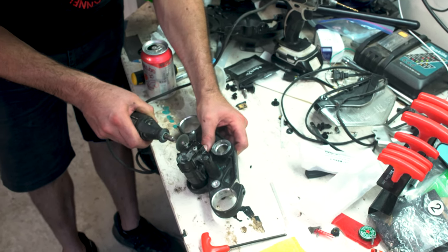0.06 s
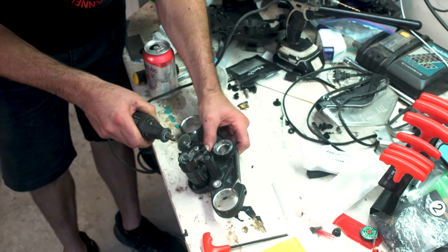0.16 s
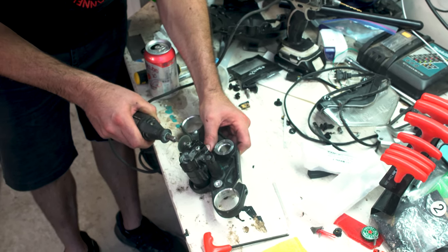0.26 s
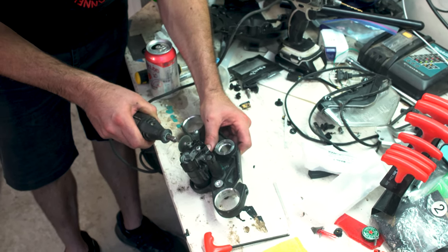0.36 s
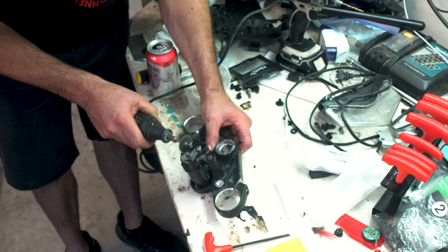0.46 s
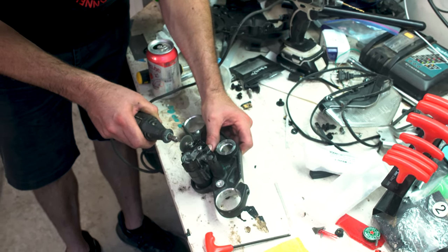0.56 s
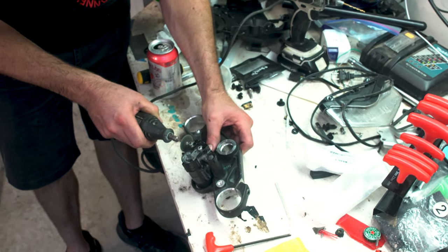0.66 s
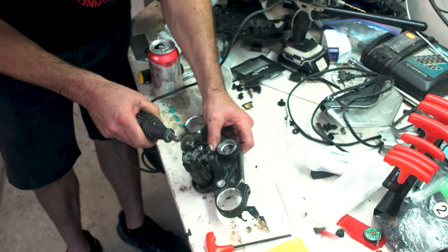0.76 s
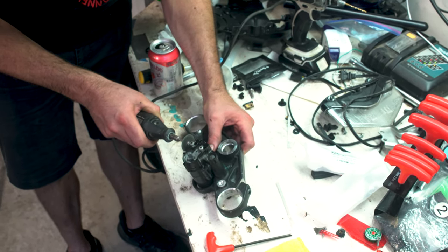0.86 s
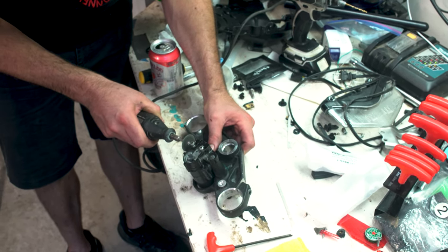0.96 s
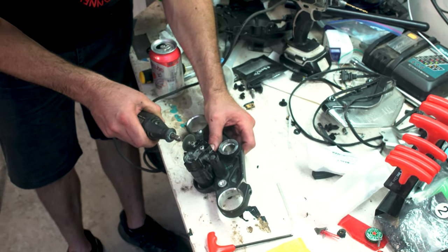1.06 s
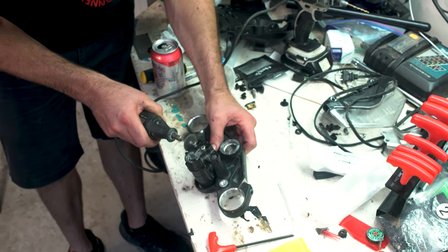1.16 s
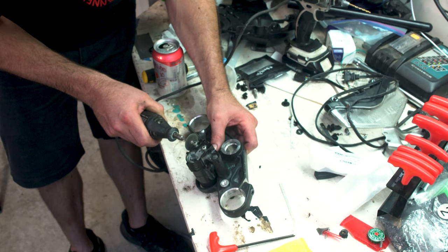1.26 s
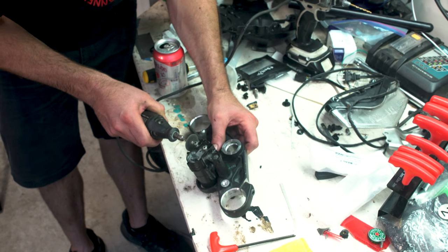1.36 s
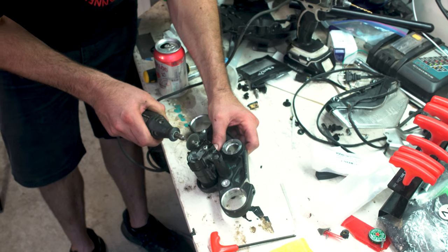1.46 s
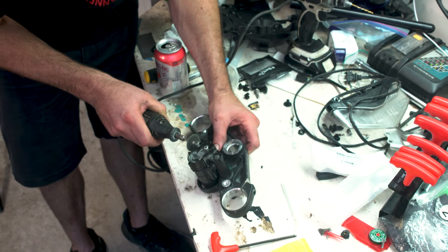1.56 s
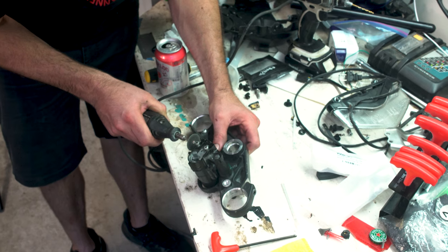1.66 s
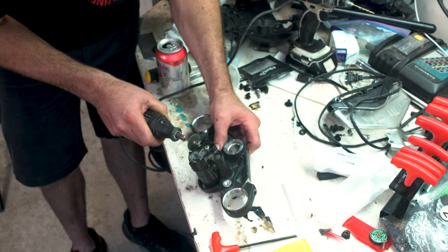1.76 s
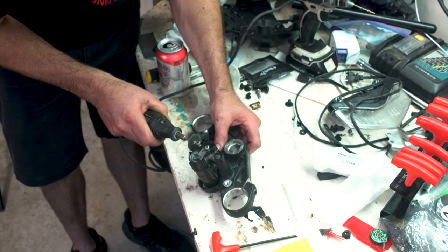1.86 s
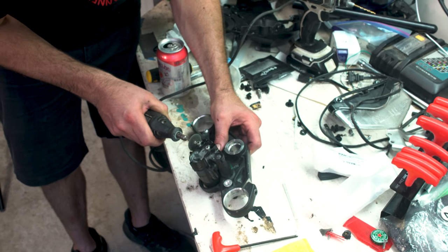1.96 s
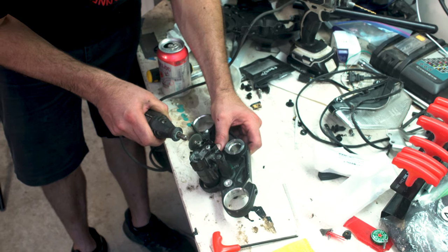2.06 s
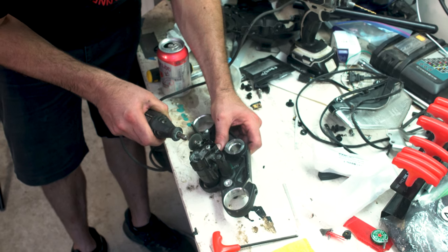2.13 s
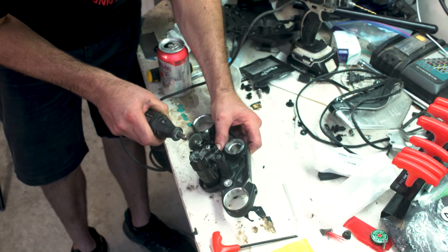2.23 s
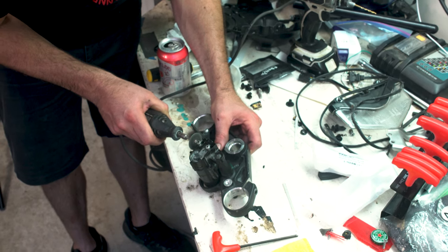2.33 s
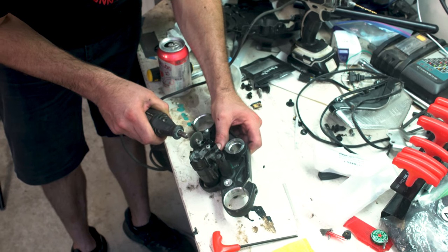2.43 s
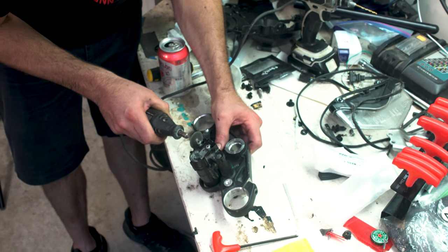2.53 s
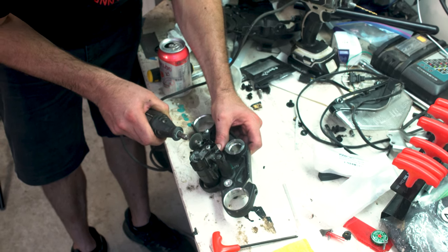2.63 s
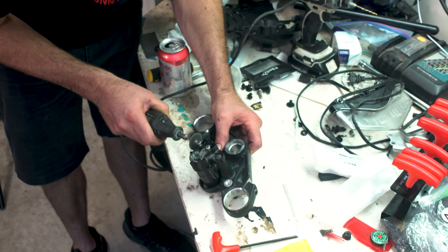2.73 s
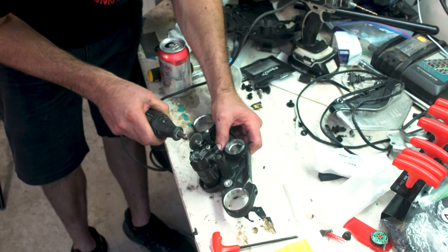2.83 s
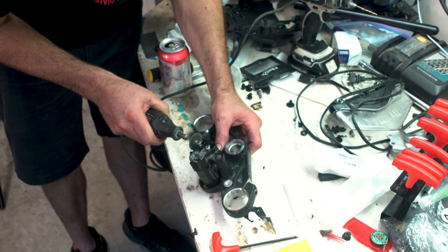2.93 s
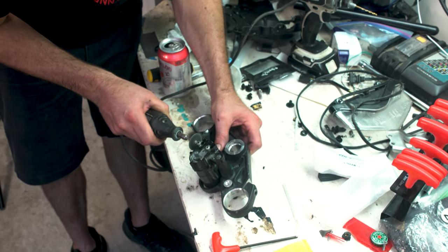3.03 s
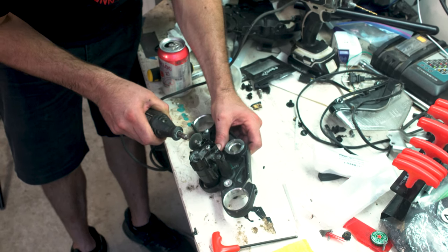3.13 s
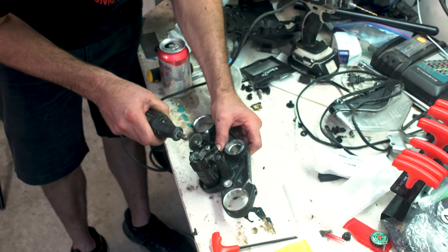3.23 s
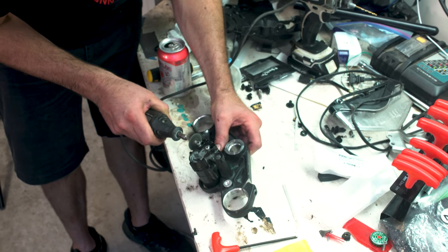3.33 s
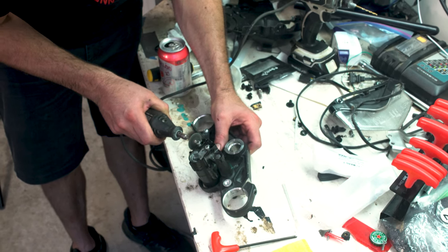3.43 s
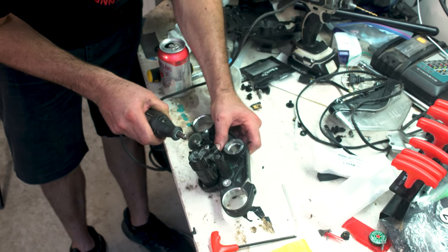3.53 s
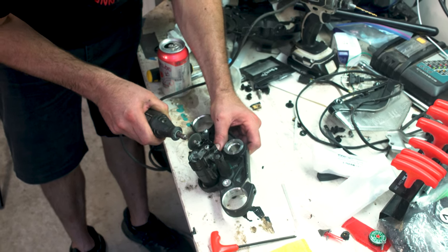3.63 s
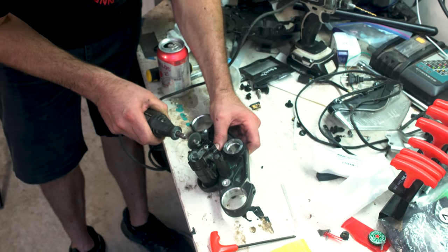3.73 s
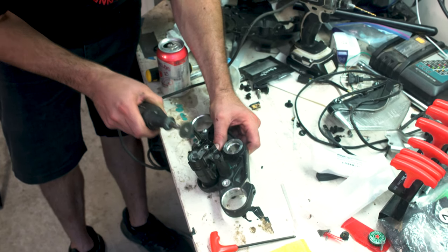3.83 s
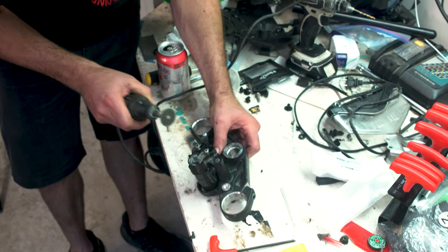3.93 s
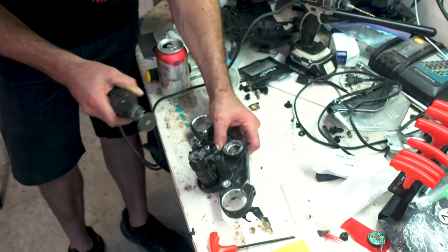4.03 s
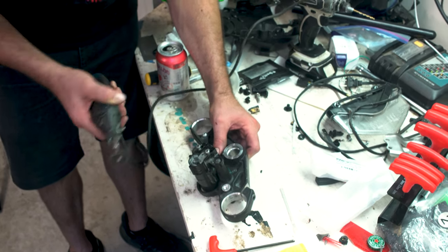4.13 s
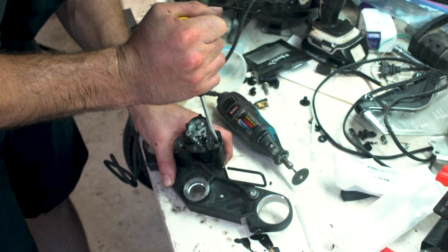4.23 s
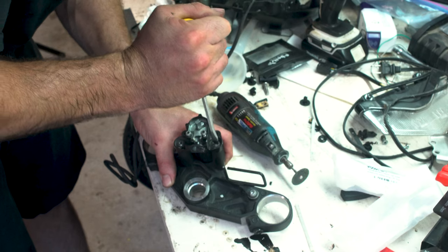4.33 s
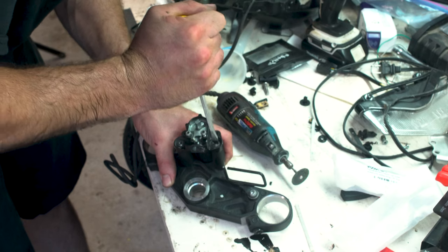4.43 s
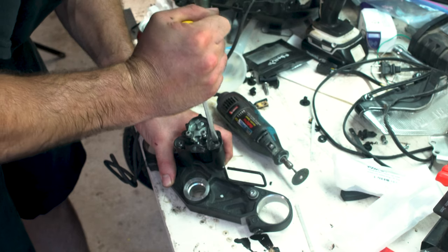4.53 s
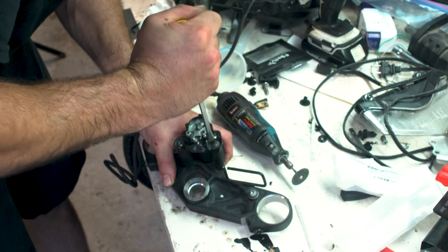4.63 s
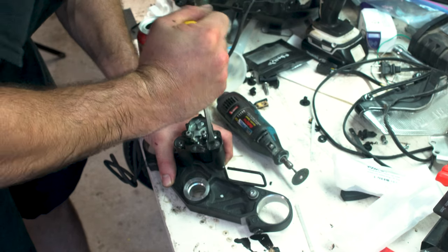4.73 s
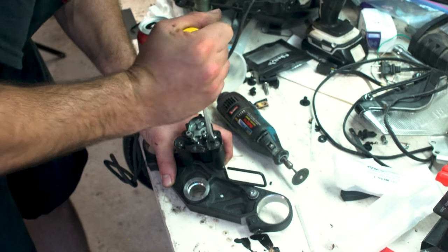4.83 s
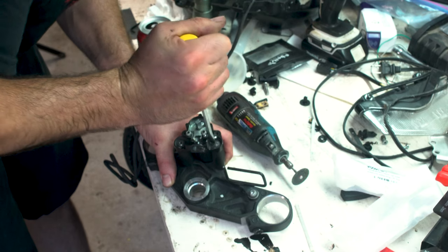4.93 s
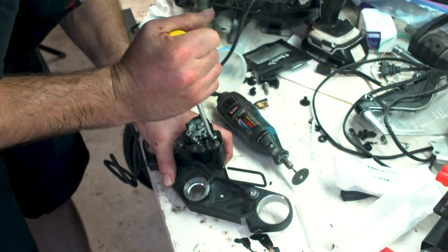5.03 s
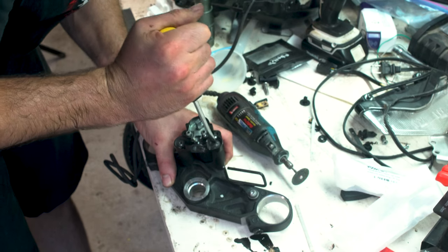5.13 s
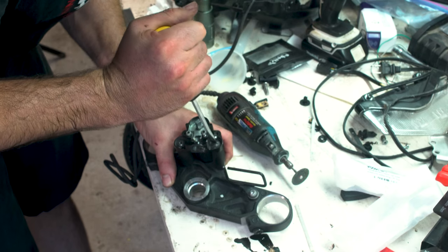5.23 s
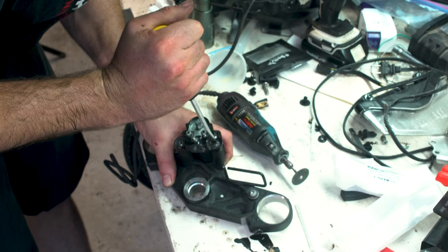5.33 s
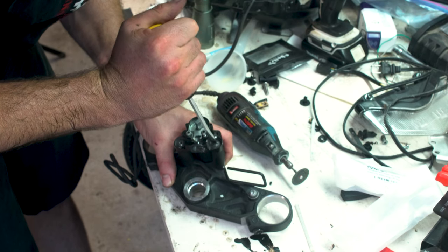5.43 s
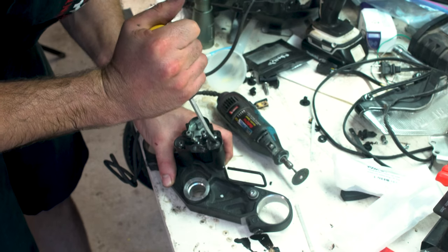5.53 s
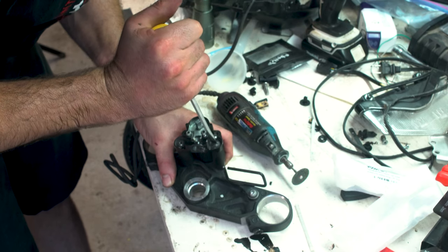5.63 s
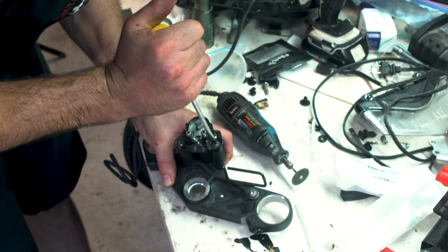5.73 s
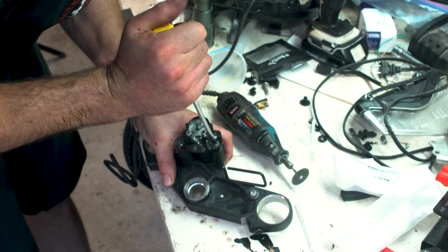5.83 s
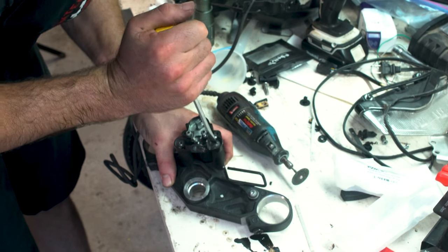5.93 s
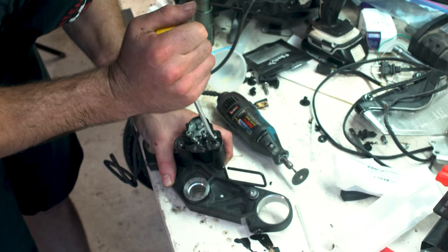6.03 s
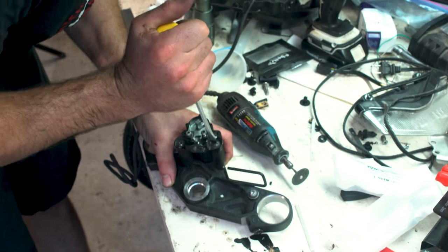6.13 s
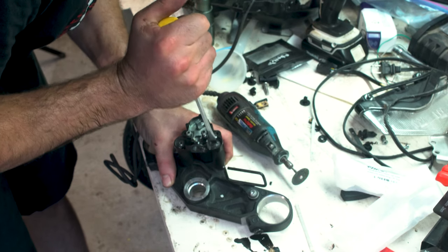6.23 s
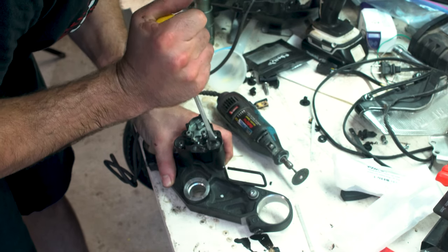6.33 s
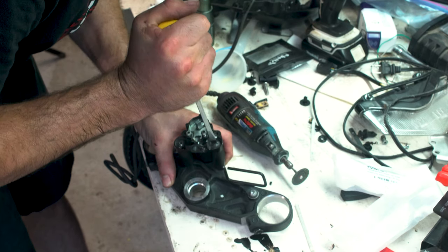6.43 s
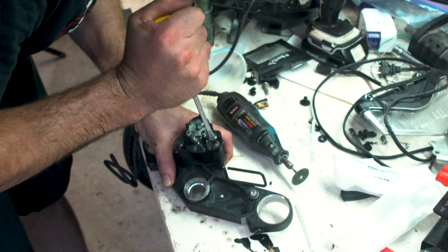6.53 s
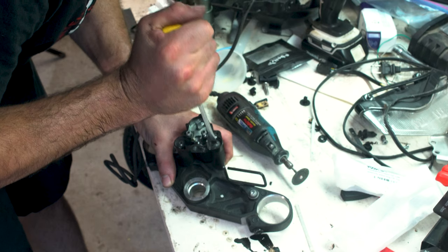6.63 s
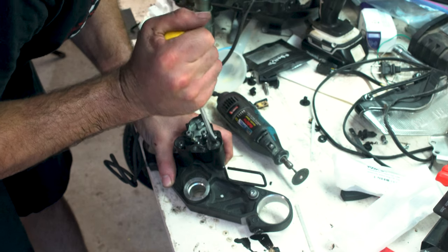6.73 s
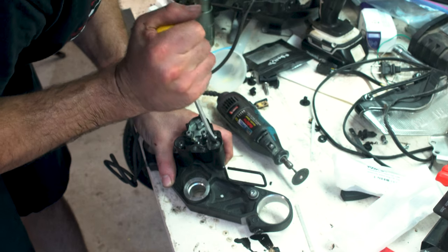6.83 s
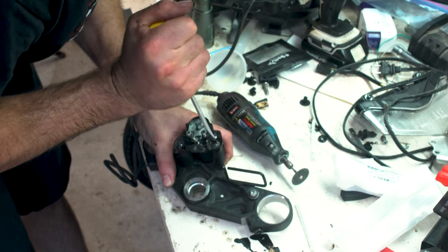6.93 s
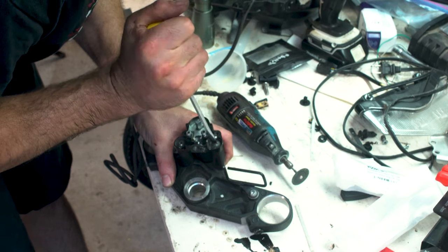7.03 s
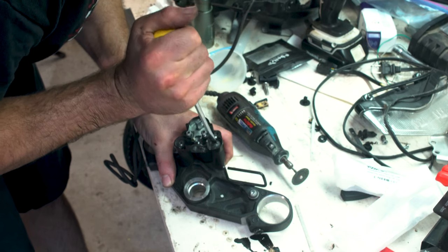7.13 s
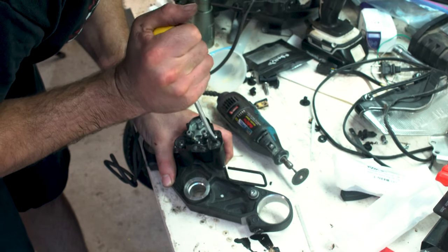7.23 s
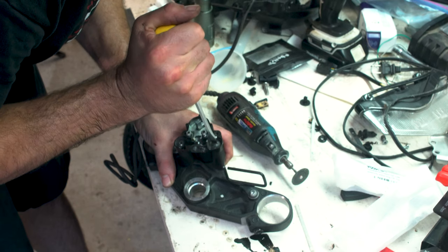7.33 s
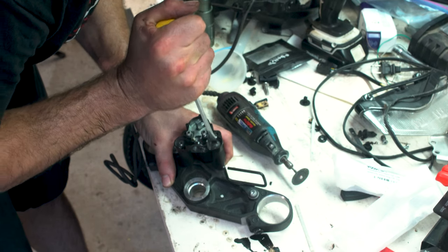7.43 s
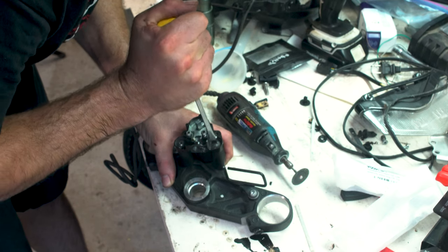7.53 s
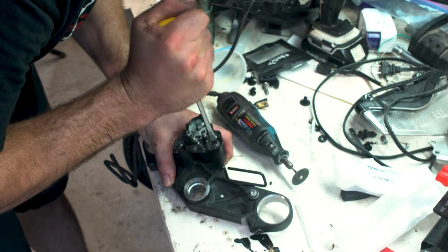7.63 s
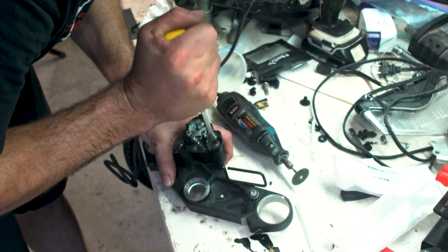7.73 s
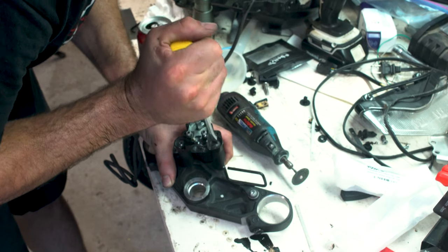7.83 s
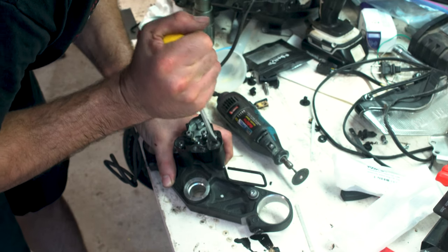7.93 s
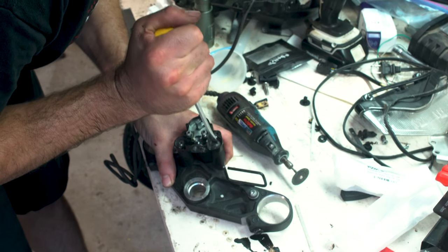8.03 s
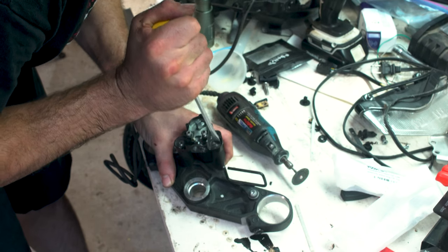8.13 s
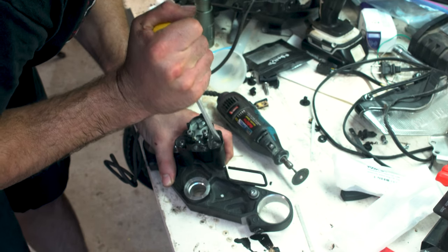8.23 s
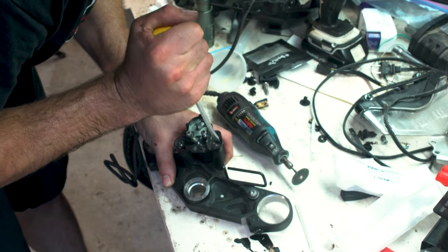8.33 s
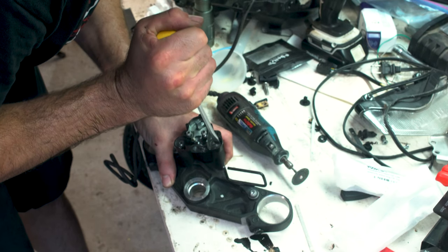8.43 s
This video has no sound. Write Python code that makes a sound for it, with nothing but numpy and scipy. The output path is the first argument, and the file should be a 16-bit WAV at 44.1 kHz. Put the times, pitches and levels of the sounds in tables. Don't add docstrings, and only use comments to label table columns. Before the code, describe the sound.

A small rotary tool grinds a hard metal bolt with wavering, sagging pitch, lifts off and revs up, then a screwdriver knocks sharply on metal.

```python
import sys
import numpy as np
from scipy import signal
from scipy.fft import rfft, irfft, next_fast_len
from scipy.io import wavfile
from scipy.ndimage import uniform_filter1d

SR = 44100
rng = np.random.default_rng(int(sys.argv[2]) if len(sys.argv) > 2 else 0)


def volts_from_db(level):
    exponent = np.asarray(level, float) / 20
    return 10 ** exponent


def int16_out(signal):
    q = np.round(np.clip(np.atleast_2d(signal).T, -1, 1) * 32767)
    wavfile.write(sys.argv[1], SR, q.astype(np.int16))


N = 373951
T = np.arange(N) / SR
LIFT_S, SPLICE_S = 3.835, 4.304
EDGE_S = 0.024


def level(x, db):
    return x * volts_from_db(db) / np.sqrt(np.mean(x[x != 0] ** 2))


def band(x, lo_hz, hi_hz):
    sos = signal.butter(2, [lo_hz, min(hi_hz, .45 * SR)], "bandpass", fs=SR, output="sos")
    return signal.sosfilt(sos, x)


def even(x):
    return x / np.sqrt(uniform_filter1d(x ** 2, size=2400) + 1e-12)


def colour(x, points, peaks=()):
    n = next_fast_len(len(x))
    f = np.maximum(np.arange(n // 2 + 1) * SR / n, 1)
    point_hz, point_db = np.transpose(points)
    db = np.interp(np.log(f), np.log(point_hz), point_db)
    db = db + sum(g / (1 + (2 * (f - hz) / w) ** 2) for hz, w, g in peaks)
    return irfft(rfft(x, n) * volts_from_db(db), n)[:len(x)]


def columns(table):
    s, *cols = np.transpose(table)
    return [np.interp(T, s, c) for c in cols]


def fade(t60):
    return np.exp(-np.log(1000) * T[:SR // 2] / t60)


def add(out, s, x):
    i = int(s * SR)
    out[i:i + len(x)] += x[:N - i]


def walk(rate):
    k = int(SR / rate)
    steps = np.repeat(rng.standard_normal(N // k + 1), k)
    return 2.11 * uniform_filter1d(uniform_filter1d(steps, k), k)[:N]


def spells(rows):
    return sum(h * np.clip(np.minimum(T - a, b - T) / EDGE_S + .5, 0, 1) for a, b, h in rows)


def freed(x, start, end, hz, width):
    out = np.zeros(N)
    part = slice(max(int((start - EDGE_S) * SR), 0), int((end + EDGE_S) * SR))
    out[part] = even(band(x[part], hz - width, hz + width))
    return out * spells([(start, end, 1)])


def modes(table, chance, spread_db):
    t, x = T[:SR // 2], 0
    for (hz, db, t60), (a, b) in zip(table, chance):
        x = x + volts_from_db(db + spread_db * a) * fade(t60) * np.sin(2 * np.pi * hz * (1 + 0.0082 * b) * t)
    return x / np.abs(x).max()


def room(x, wet_db):
    # pitch in Hz, time to die away by 60 dB in seconds.
    tail_times = [(125, 0.94), (250, 0.055), (500, 0.5), (1000, 0.21), (2000, 0.49), (4000, 0.15),
                  (8000, 0.096), (15000, 0.046)]
    tail = sum(band(rng.standard_normal(SR // 2), hz / 1.48, hz * 1.445) * fade(t60) for hz, t60 in tail_times)
    tail = tail * (1 - np.exp(-T[:SR // 2] / 0.0055))
    return x + volts_from_db(wet_db) * signal.fftconvolve(x, tail / np.sqrt(np.sum(tail ** 2)))[:N]


def rim(turns, keep, count):
    keep = np.clip(keep, 0, .99)
    fresh = rng.standard_normal((1200, count))
    wear = signal.lfilter([np.sqrt(1 - keep ** 2)], [1, -keep], fresh, axis=0)[40:]
    return np.interp(turns * count, np.arange(wear.size), wear.ravel())


def disc_bite(turns):
    # time in seconds, once-a-turn swing, twice-a-turn swing of the contact.
    wobble = [(0, .95, .05), (.3, .8, .1), (.65, .25, .45), (.8, .75, .3), (1.05, .45, .3), (1.25, .5, .45),
              (1.35, .85, .15), (1.55, .7, .1), (1.65, .3, .25), (2.15, .12, .12), (2.45, .2, .25),
              (2.55, .85, .25), (2.85, 1., .25), (3.15, .15, .35), (3.83, .2, .2)]
    once, twice = columns(wobble)
    press = once * np.cos(2 * np.pi * turns) + twice * np.sin(4 * np.pi * turns)
    press = press + .24 * rim(turns, 0.38, count=6)
    return 1 + np.tanh(press + 0.45) + 0.19 * np.exp(np.minimum(press, 2))


def edge_grit(turns):
    grit = level(rim(turns, .95, count=512), 0)
    pulse = np.exp(60 * (np.cos(2 * np.pi * turns) - 1)) ** 22
    strike = pulse * volts_from_db(1.7 * rim(turns, 0.51, count=1))
    return grit + level(strike - strike.mean(), -3)


def disc_and_bolt(x):
    # pitch in Hz, level in dB per Hz.
    smooth = [(300, -37.5), (600, -25), (1100, -2), (1450, -3.5), (2100, -1.5), (2600, -8), (3600, -13),
              (6400, -10), (6900, -5), (9500, -12.5), (11000, -12.5), (12200, -6), (12500, -2), (16000, -4)]
    # pitch in Hz, width in Hz, height in dB.
    bumps = [(1760, 900, 6.5), (2174, 150, 6.5), (2836, 200, 1), (4110, 150, 3), (4870, 110, 5),
             (5790, 450, 7), (7080, 330, 2.5), (7940, 1100, 6), (9030, 960, 12), (10230, 250, 5.5),
             (12780, 300, 1), (12150, 400, -3), (13050, 150, -4), (13240, 100, 1), (13920, 600, 3),
             (14600, 400, -3.5), (15300, 700, 5)]
    return colour(x, smooth, bumps)


def disc_hiss(bite, grit, fresh, hiss_db):
    # start in seconds, end in seconds, pitch in Hz, level in dB over the hiss.
    swells = [
        (.1, 1.35, 7450, -18),
        (2.45, 2.75, 7200, -13),
        (.9, 1.35, 8950, -12),
        (2.4, 2.6, 8950, -12),
        (2.75, 2.95, 8950, -9),
        (.8, 1.35, 14000, -13),
        (.1, 1.35, 12700, -15),
        (2.25, 3.05, 13950, -11),
        (.15, .35, 13400, -12),
    ]
    out = volts_from_db(hiss_db) * even(band(disc_and_bolt(bite * (fresh + 0.6 * grit)), 4180, 26000))
    for a, b, hz, db in swells:
        out = out + volts_from_db(hiss_db + db) * freed(bite * (fresh + grit), a, b, hz, 292)
    return out


def ringing_body(bite, grit, fresh, hiss_db, housing_db, bolt_db):
    body = disc_and_bolt(bite ** 0.29 * (grit + .15 * fresh))
    out = np.zeros(N)
    for lo, hi, db in [(550, 1650, housing_db), (1400, 2600, bolt_db), (2300, 3700, -11.5)]:
        out = out + volts_from_db(hiss_db + db + walk(7.94)) * even(band(body, lo, hi))
    rasp = disc_and_bolt(bite ** 0.4 * (1.2 * grit + 0.65 * fresh))
    return out + volts_from_db(hiss_db - 9.5) * even(band(rasp, 3060, 5790))


def scrapes_and_singing(bite, grit, hiss_db):
    # start in seconds, end in seconds, pitch in Hz, level in dB over the hiss.
    scrapes = [(0, .4, 1780, -20), (0, .55, 2130, -18), (.75, .86, 3200, -13), (1.0, 1.07, 3050, -12),
               (.9, 1., 3150, -16), (1.33, 1.46, 2750, -12), (1.52, 1.65, 3000, -19),
               (1.72, 1.97, 2080, -15), (2.02, 2.12, 2100, -15), (2.33, 2.5, 2550, -14),
               (2.36, 2.58, 2100, -14), (2.48, 2.6, 1720, -14), (3.05, 3.3, 2150, -18),
               (3.42, 3.8, 2100, -17), (3.5, 3.62, 3050, -21)]
    # start in seconds, end in seconds, pitch in Hz, level in dB.
    sings = [
        (.92, 1.06, 5900, -35.5),
        (1.14, 1.34, 4170, -36),
        (1.36, 1.43, 5200, -35),
        (2.7, 3.1, 4600, -38),
    ]
    out = np.zeros(N)
    for a, b, hz, db in scrapes:
        out = out + volts_from_db(hiss_db + db) * freed(grit, a, b, hz, hz * .09)
    for a, b, hz, db in sings:
        out = out + volts_from_db(db) * freed(bite * grit, a, b, hz, 144)
    return out


def motor_whine(bite, turns):
    # start in seconds, end in seconds, multiple of shaft speed, level in dB.
    locks = [(0, .15, 18, -27), (.1, .3, 17, -25), (0, .27, 14, -30), (.14, .4, 9, -31), (.27, .4, 8, -30),
             (.4, 1.04, 15, -28), (.75, .95, 19, -33), (.4, .75, 12, -36), (.45, .75, 10, -36),
             (.75, 1.05, 27, -33), (.9, 1.05, 23, -33), (1.3, 1.45, 27, -33), (1.3, 1.45, 25, -34),
             (1.73, 1.84, 23, -30), (1.73, 1.84, 21, -32), (1.85, 2.05, 14, -33), (.38, .56, 19, -30),
             (.4, .75, 5, -41), (1.1, 1.42, 17, -31), (1.1, 1.3, 20, -32), (1.55, 1.75, 21, -32),
             (.6, .9, 20, -33), (1.9, 2.52, 15, -40), (2.1, 2.5, 8, -42), (2.8, 3.3, 12, -38),
             (2.8, 3.3, 10, -38), (2.7, 2.9, 18, -34), (3.05, 3.3, 23, -34), (2.7, 3.05, 19, -31),
             (2.85, 3.05, 21, -32), (3.1, 3.5, 8, -40), (3.3, 3.6, 14, -33)]
    tones = sum(spells([(a, b, volts_from_db(db))]) * np.sin(2 * np.pi * k * turns) for a, b, k, db in locks)
    return volts_from_db(2 * walk(25) - 3.0) * bite ** .5 * tones


def cutting():
    # time in seconds, shaft speed in Hz, pressure as hiss level in dB.
    shaft = [(0, 117, -17.5), (.23, 121.8, -16), (.39, 115.2, -17), (.61, 111.7, -18.5), (.98, 110.7, -16),
             (1.14, 103.7, -17), (1.63, 98.4, -17), (1.71, 93.8, -19), (1.83, 92.63, -17.5),
             (2.13, 73.87, -20), (2.3, 69.2, -17.5), (2.51, 78.75, -15.5), (2.62, 95.8, -16.5),
             (2.8, 102.3, -18.5), (3.0, 104.1, -17), (3.31, 94.24, -18), (3.63, 68.93, -18),
             (3.83, 61.06, -22.5)]
    # start in seconds, end in seconds, extra unbalance in dB, extra rattle in dB.
    bounces = [
        (0, .38, 9, 5),
        (1.12, 1.65, 8, 3),
        (.62, 1.1, 6, 1),
        (1.75, 2.1, 2, -5),
        (2.1, 2.48, 9, -3),
        (2.54, 3.06, 12, 5),
        (3.2, 3.8, 6, -1),
    ]
    # time in seconds, size in dB.
    jumps = [(.19, 2), (.33, 2), (.55, 1), (.73, 5.5), (.82, 7), (.88, 6.5), (1.11, 5), (1.34, 5),
             (1.37, 5), (1.45, 2.5), (1.69, 5.5), (1.8, 4.5), (2.2, 7), (2.63, 5), (2.68, 3.5), (3.25, 3),
             (3.3, 4), (3.47, 4)]
    hz, hiss_db = columns(shaft)
    swing_db = spells([(a, b, u) for a, b, u, r in bounces])
    jump_db = sum(db * np.exp(-((T - s) / 0.0072) ** 2) for s, db in jumps)
    hiss_db = hiss_db + 0.55 * jump_db + 0.45 * walk(12)
    shake_db = hiss_db - 18.5 + spells([(a, b, r) for a, b, u, r in bounces]) + jump_db
    housing_db = -10 + 0.08 * jump_db + 2 * np.log2(120 / hz)
    turns = np.cumsum(hz) / SR
    turns = turns + .0012 * (3 + walk(45))
    bite, grit, fresh = disc_bite(turns), edge_grit(turns), rng.standard_normal(N)
    out = disc_hiss(bite, grit, fresh, hiss_db)
    out = out + ringing_body(bite, grit, fresh, hiss_db, housing_db, -6 + 0.13 * swing_db)
    out = out + scrapes_and_singing(bite, grit, hiss_db) + motor_whine(bite, turns)
    rattle = bite * (grit + 3.1 * fresh * volts_from_db(3.8 * walk(25.49)))
    out = out + volts_from_db(shake_db) * even(band(rattle, 87, 1000))
    out = out + volts_from_db(shake_db - 13.0) * level(band(fresh, 15, 48), 0)
    out = out + volts_from_db(hiss_db - 27 + swing_db + walk(15)) * np.sin(2 * np.pi * turns)
    return out * np.clip((LIFT_S - T) / 0.0031, 0, 1)


def shop():
    # pitch in Hz, level in dB per Hz.
    tone = [(12, -48), (20, -8), (49, 1.5), (113, -2.5), (187, -8.5), (241, -8), (337, -12), (434, -11),
            (678, -10.5), (873, -11.5), (1400, -15.5), (1960, -25), (2600, -23.5), (6010, -37),
            (16000, -43)]
    # pitch in Hz, level in dB.
    hums = [(59.5, -70), (120, -60), (241, -56.5), (15633, -82)]
    low, high = (colour(rng.standard_normal(N), tone) for _ in range(2))
    high = band(high, 1505, 19000) * volts_from_db(0.74 * walk(5.9))
    low = (low - band(low, 1100, 19000)) * volts_from_db(.6 * walk(6.6) + .7 * walk(14.0))
    hum = sum(volts_from_db(db + walk(3.4)) * np.sqrt(2) * np.sin(2 * np.pi * hz * T) for hz, db in hums)
    return level(low + high, -46.8) + hum


def jolt():
    out = np.zeros(N)
    add(out, 3.75, volts_from_db(2.5) * band(rng.standard_normal(SR // 2) * fade(0.027), 8500, 9000))
    return out


def spinning():
    # time in seconds, level in dB.
    air = [(3.86, -46), (3.94, -43), (3.984, -40), (4.102, -39), (4.299, -37)]
    # time in seconds, shaft speed in Hz.
    speed = [(3.84, 62), (4.05, 97), (4.12, 110), (4.2, 120), (4.25, 128), (4.3, 137)]
    # pitch in Hz, level in dB per Hz.
    smooth = [(59, -63), (100, -32), (255, -43), (406, -14), (583, -13), (676, -8), (784, -11), (930, -7),
              (1550, -8.5), (2420, -5.5), (4870, -19), (14400, -16.5), (16000, -24)]
    # pitch in Hz, width in Hz, height in dB.
    bumps = [(6260, 1520, -0.5), (8900, 3000, 4), (14600, 400, 5)]
    # time in seconds, pitch in Hz, level in dB.
    housing = [(3.85, 2228, -56), (3.89, 2336, -38.5), (3.93, 2370, -52), (3.99, 2380, -38),
               (4.04, 2480, -42), (4.06, 2440, -70)]
    # multiple of shaft speed, level in dB at full speed, growth with speed.
    whines = [(15, -41, 4), (33, -50, 1), (45, -52, 5), (29, -54, 4)]
    spark_hz = 120
    (air_db,), (hz,), (ring_hz, ring_db) = columns(air), columns(speed), columns(housing)
    turns, on = np.cumsum(hz) / SR, (T > LIFT_S) * (T < SPLICE_S)
    sparks = np.zeros(N)
    at = (np.arange(LIFT_S, SPLICE_S, 1 / spark_hz) * SR).astype(int)
    sparks[at] = volts_from_db(4.6 * rng.standard_normal(len(at))) * np.clip((T[at] - 3.9) / 0.16, .2, 1)
    gate = signal.lfilter([1], [1, -np.exp(-1 / (.0009 * SR))], sparks)
    gusts = rng.standard_normal(N) * on * (.65 + gate)
    out = volts_from_db(air_db) * level(on * colour(gusts, smooth, bumps), -0.65)
    flutter = 1 + 1.2 * np.cos(2 * np.pi * spark_hz * T)
    ring = volts_from_db(ring_db) * flutter * np.sin(2 * np.pi * np.cumsum(ring_hz) / SR)
    out = out + ring * volts_from_db(2 * walk(30))
    for k, db, grow in whines:
        out = out + volts_from_db(db + 2 * walk(12)) * (hz / 137) ** grow * np.sin(2 * np.pi * k * turns)
    return on * out


def fidgets():
    # time in seconds, level in dB, pitch in Hz.
    ticks = [
        (3.95, -47.5, 380),
        (5.083, -70, 11000),
        (5.137, -62, 5000),
        (5.89, -64, 3300),
        (5.985, -67.5, 10000),
        (6.01, -67, 8700),
        (6.032, -65.5, 9000),
        (7.015, -64.5, 7100),
    ]
    # middle in seconds, length in seconds, level in dB.
    rustles = [
        (5.35, 0.085, -75),
        (5.485, .06, -68),
        (5.684, 0.067, -71),
        (6.671, .05, -74),
        (6.958, 0.035, -62),
        (7.039, 0.09, -68),
        (7.167, .08, -75),
        (8.289, 0.048, -64),
    ]
    out = np.zeros(N)
    for s, db, hz in ticks:
        add(out, s, level(band(rng.standard_normal(SR // 2) * fade(0.017), hz * 0.72, hz * 1.34), db - 15.5))
    for s, length, db in rustles:
        n = int(2 * length * SR)
        add(out, s - length, level(np.hanning(n) * band(rng.standard_normal(n), 2500, 13500), db))
    return out


def pings():
    # time in seconds, pitch in Hz, level in dB, time to die away by 60 dB in seconds.
    lone_modes = [(4.24, 400, -44.5, .2), (4.955, 1860, -17, 0.06), (4.955, 2530, -15, .165),
                  (4.955, 2940, -25, .17), (4.955, 2830, -24, .1), (4.955, 1954, -25, .1),
                  (4.955, 1007, -22, .17), (4.955, 5319, -33, .13), (4.955, 3521, -33, .14),
                  (4.955, 3887, -36, .18), (4.955, 4640, -38, .15), (4.955, 4790, -38, .15),
                  (4.954, 3700, -14, .016), (4.954, 5100, -16, .016), (4.955, 6385, -36, .12),
                  (4.686, 2536, -25, .16), (4.686, 4867, -36, .18), (4.686, 6304, -31, .15),
                  (4.686, 10290, -46, .11), (7.906, 490, -22, .12), (6.76, 1943, -27, .15),
                  (6.76, 2514, -34, .2), (6.737, 2520, -24, .1), (6.76, 1104, -19, .13),
                  (6.76, 1281, -28, .25), (6.76, 1475, -25, .09), (7.907, 1001, -19, .085),
                  (7.907, 1109, -20, .1), (7.907, 1297, -30, .25), (7.862, 1114, -24, .07),
                  (7.862, 1378, -25, .05), (7.862, 877, -27, .09), (7.906, 1943, -25, .1),
                  (4.956, 950, -20, .15), (6.246, 1100, -42, .07), (6.247, 1900, -41, .07),
                  (6.248, 4650, -43, .05), (6.249, 8800, -49, .05), (6.249, 7900, -50, .04),
                  (8.402, 12500, -52, .02), (6.736, 4300, -19, .02), (7.907, 2530, -24, .095),
                  (7.907, 2525, -42, .35), (8.177, 3050, -27, 0.03), (8.177, 530, -14, .06),
                  (8.177, 1500, -20, .04), (8.402, 520, -21, .04), (7.418, 360, -30, .06),
                  (7.418, 800, -30, .04), (4.686, 450, -24, .06)]
    out, t = np.zeros(N), T[:SR // 2]
    for s, hz, db, t60 in lone_modes:
        add(out, s, volts_from_db(db) * fade(t60) * (1 - np.exp(-t / .0004)) * np.sin(2 * np.pi * hz * t))
    return out * volts_from_db(1.3 * walk(150))


def tip_crack(crack):
    tip = band(crack * (fade(0.0079) + 0.24 * fade(0.045)), 3200, 8770)
    tip = tip + 0.09 * band(crack * fade(0.12), 2700, 6500)
    tip = tip + 0.021 * band(crack * fade(0.38), 3500, 11000)
    return tip + volts_from_db(-11.5) * band(crack * fade(0.028), 8000, 17000)


def knocks():
    # time in seconds, peak in dB, pitch of the blow in Hz, thump and tip crack in dB over the peak.
    slips = [(4.676, -21, 1210, -30, -5), (4.6808, -25, 1490, -29, 8), (4.684, -2.5, 3330, -15.5, 1),
             (4.953, -1.5, 2840, -18, -3), (4.969, -16.5, 2560, -27, -18), (6.245, -37, 1910, -27, -1),
             (6.735, 0, 1110, -25.5, -15.5), (6.757, -6.5, 1240, -23, -19), (7.417, -25, 468, -3, -51.5),
             (7.445, -38, 500, -1, -35), (7.86, -9, 1100, -19.5, -22.5), (7.905, -1.5, 1180, -19.5, -17),
             (8.175, -9, 900, -8.5, -8), (8.4, -13, 590, -15, -35)]
    # pitch in Hz, level in dB, time to die away by 60 dB in seconds.
    rings = [(230, 9, 0.18), (500, 6.5, 0.13), (616, 10.5, 0.077), (741, -14, 0.11), (790, -10, 0.42),
             (970, -21, 0.22), (1100, -2, 0.069), (1169, -16, 0.1), (1564, 6, .06), (1874, -7, 0.04),
             (1786, -2.5, 0.18), (2680, -29, 0.051)]
    # pitch in Hz, level in dB, time to die away by 60 dB in seconds.
    legs = [(46.3, -9, 0.2), (76, -4.5, 0.12), (103.7, -8, 0.14)]
    out, t = np.zeros(N), T[:SR // 2]
    blow_s = .001
    for s, peak_db, hz, thump_db, tip_db in slips:
        crack, chance = rng.standard_normal(len(t)), rng.standard_normal((len(rings), 2))
        half_s = min(blow_s, .0002 + .8 / hz)
        blow = np.exp(-((t - .0019) / half_s) ** 2) * np.sin(2 * np.pi * hz * t)
        rattle = band(band(crack * fade(0.066), 350, 1100 + hz), 100, 1500 + 0.14 * hz)
        near = [(f, g - 5.5 * abs(np.log2(f / np.minimum(hz, 1500))), d) for f, g, d in rings]
        body = volts_from_db(-0.5) * rattle / np.abs(rattle).max() + volts_from_db(-6.5) * modes(near, chance, 3.7)
        body = body * (1 - np.exp(-(t / (3 * blow_s)) ** 2))
        x = blow + (body + volts_from_db(tip_db) * tip_crack(crack)) * (1 - np.exp(-(t / 0.00036) ** 2))
        thump = modes(legs, chance, 3.7) * (1 - np.exp(-t / 0.013))
        add(out, s, volts_from_db(peak_db) * (x + volts_from_db(thump_db + 10.0) * thump))
    return out


def outdoors():
    # start in seconds, length in seconds, first and last pitch in Hz, level in dB.
    chirps = [
        (5.556, 0.076, 3580, 3490, -59),
        (5.62, 0.031, 2450, 2600, -53),
        (5.69, .04, 2060, 2250, -57),
        (5.91, 0.058, 4900, 4530, -70),
        (6.04, .08, 3680, 3050, -61),
        (6.125, 0.016, 2290, 2230, -61.5),
        (6.155, .03, 2170, 2100, -57.5),
        (6.5, 0.067, 2145, 2740, -56),
        (7.2, 0.12, 2100, 3460, -60),
    ]
    # start in seconds, end in seconds.
    trills = [
        (5.33, 5.4),
        (4.87, 4.94),
        (6.0, 6.3),
        (6.8, 6.9),
        (7.5, 7.9),
        (8.2, 9.9),
    ]
    # pitch in Hz, level in dB.
    trill_lines = [(3620, -68), (8150, -75), (11200, -77)]
    out = np.zeros(N)
    for s, length, hz0, hz1, db in chirps:
        n = int(length * SR)
        glide = np.cumsum(np.linspace(hz0, hz1, n)) / SR
        add(out, s, volts_from_db(db) * np.hanning(n) * np.sin(2 * np.pi * glide))
    on = uniform_filter1d(sum((T > a) & (T < b) for a, b in trills) * 1., size=2000)
    return out + on * sum(volts_from_db(db + 1.8 * walk(30)) * np.sin(2 * np.pi * hz * T) for hz, db in trill_lines)


def scene():
    first = (room(cutting() + jolt(), -17) + spinning()) * (T < SPLICE_S)
    tone = shop() * np.where(T < SPLICE_S, volts_from_db(-4.5), 1)
    return (first + room(knocks() + pings() + outdoors(), -20.5) + fidgets() + tone)[None]


def roll_off(x):
    return signal.sosfilt(signal.butter(12, 16690, fs=SR, output="sos"), x)


def record(dry):
    top = signal.ellip(14, .2, 75, 15740, fs=SR, output="sos")
    return roll_off(signal.sosfilt(top, np.clip(dry, -.98, .98)))


dry = scene()
out = record(dry)
int16_out(out)
```